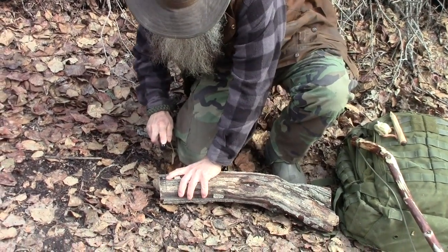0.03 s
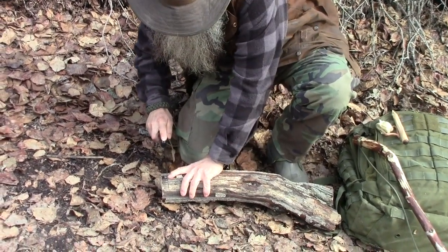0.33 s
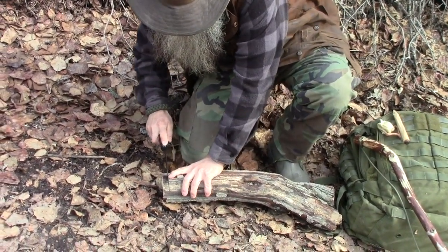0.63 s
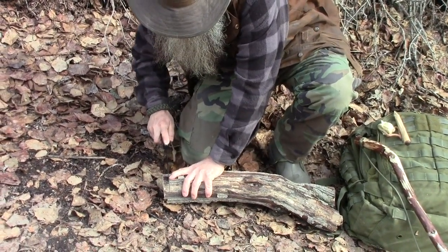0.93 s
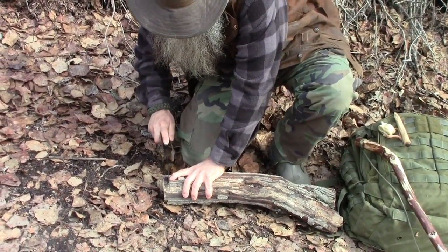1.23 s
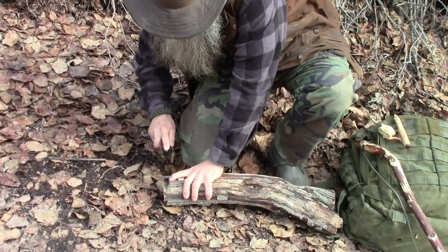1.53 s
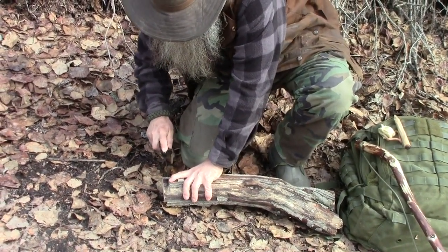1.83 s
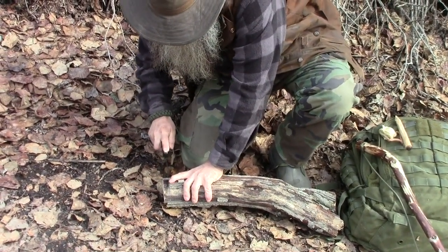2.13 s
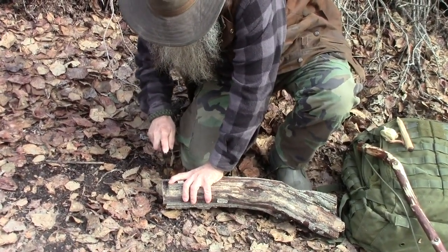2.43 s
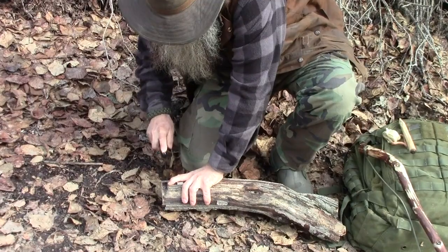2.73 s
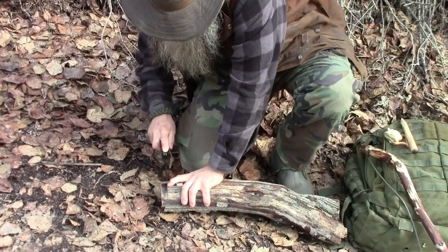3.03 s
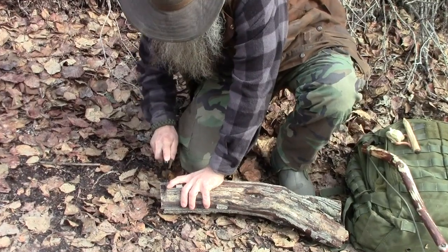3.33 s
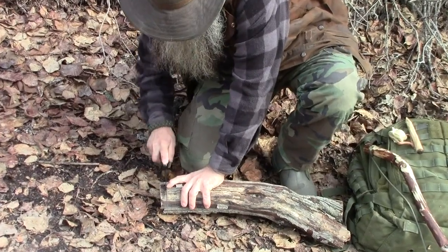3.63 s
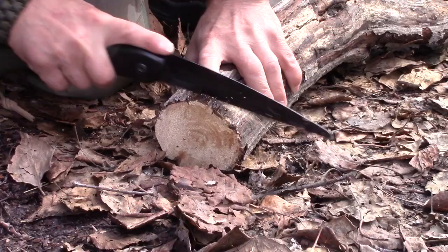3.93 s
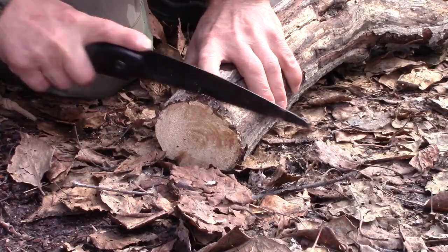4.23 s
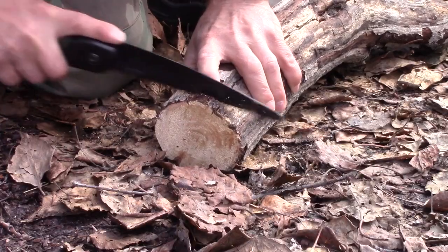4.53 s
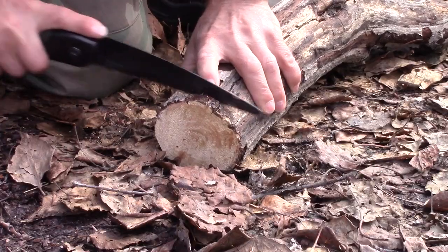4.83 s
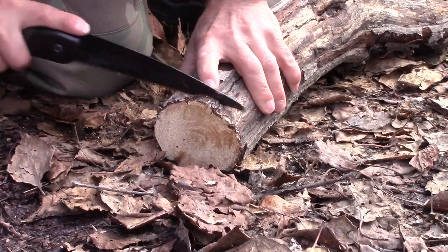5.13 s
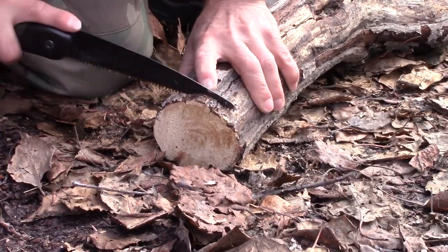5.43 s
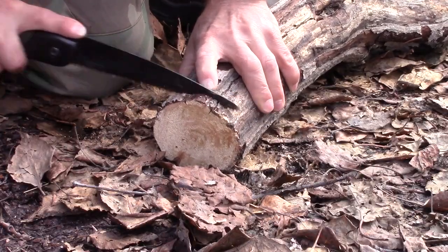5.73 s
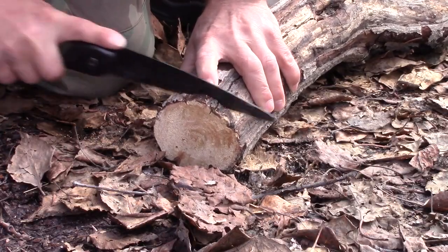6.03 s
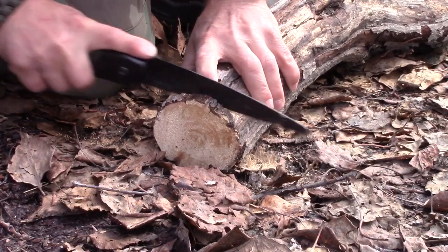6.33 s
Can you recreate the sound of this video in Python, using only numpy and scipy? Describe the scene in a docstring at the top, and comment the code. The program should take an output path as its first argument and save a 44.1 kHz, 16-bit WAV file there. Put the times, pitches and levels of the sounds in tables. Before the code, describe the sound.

Close by in a quiet forest, fallen leaves and clothing rustle while bark cracks and a hand saw makes a few light trial scrapes. Then the saw bites into the dry log and keeps going at about six strokes a second, louder than the rustling. The rasp starts splintery and grows firmer and more buzzing, with a ringing tone and occasional short squeaks from the blade.

```python
"""A hand saw cuts a dry log, six strokes a second, close by and outdoors. Its teeth tear fibres in a
rasp, drum a tone whose pitch follows the blade's speed, and drive a resonance near 900 Hz by friction.
Before the cut the saw scrapes lightly on the log. Bark and twigs snap by brittle fracture, the log
thuds on the soil and the binding blade squeaks. Fallen leaves crackle under a kneeling body,
over the faint hush of the forest. The sound is nearly mono."""
import sys
import numpy as np
from scipy import signal
from scipy.fft import rfft, irfft, next_fast_len
from scipy.io import wavfile
from scipy.ndimage import map_coordinates

SR = 44100
rng = np.random.default_rng(int(sys.argv[2]) if len(sys.argv) > 2 else 0)


def bounce(signal):
    """Save signal as a 16-bit WAV file at the path given by the first command-line argument."""
    frames = np.transpose(np.atleast_2d(signal))
    limited = np.clip(frames, -1, 1)
    pcm = np.round(limited * 32767).astype(np.int16)
    wavfile.write(sys.argv[1], SR, pcm)


N = 291060
TIME = np.arange(N) / SR
RING_HZ = 912  # the strongest resonance of blade and log

# Strokes, pull and push in turn: (start [s], rasp level [dB], moment of most force [0-1],
# ring level [dB], tooth tone over the rasp [dB])
STROKES = [(3.323, -22.5, 0.23, -29.5, -20), (3.434, -25.5, 0.08, -26.5, -36),
           (3.62, -24.5, 0.53, -29.5, -21), (3.77, -24.5, 0.31, -22.5, -19),
           (3.922, -23.5, 0.49, -27.5, -13), (4.074, -25, 0.28, -22.5, -23), (4.24, -23.5, 0.44, -30, -12),
           (4.393, -24, 0.32, -24, -3.5), (4.554, -26, 0.4, -27.5, .5), (4.723, -25.5, 0.47, -25, -13),
           (4.881, -25, 0.37, -28.5, -1.5), (5.051, -27.5, 0.4, -25, -6.5), (5.212, -25.5, 0.41, -28.5, 0),
           (5.375, -28, 0.3, -27, -3), (5.548, -28.5, 0.54, -31.5, 0.5), (5.707, -29, 0.41, -26, 1),
           (5.878, -28, 0.62, -31, -.5), (6.046, -27.5, 0.45, -25, -6.5), (6.228, -27.5, 0.35, -26, -2.5),
           (6.383, -27.5, 0.55, -25.5, -9), (6.55, -26.5, 0.56, -25, -10)]
# The cut deepens from hollow, splintery bark into firm wood: (time [s], spectral tilt [dB/kHz],
# bark lift [dB], splinter lift [dB], peakedness of the force [1], step between harmonics [dB])
KERF = [(3.38, 1.14, 9.5, 21.5, 0.96, -6), (3.65, .85, 3.5, 18, 1, -5), (4.2, 0.75, 0.5, -1.5, 0.89, -12),
        (4.5, .4, -4, 5.5, 1.24, -15), (5.2, 0.05, -4.5, 5, 1.53, -6.5), (5.7, -.5, -5, 6, 1.7, 0.5),
        (6.45, 0.64, 1, 7.5, 1.34, -4)]
def saw(teeth_per_stroke=33.3, last_turn_s=6.715, overlap_s=0.00197):
    """Reciprocating motion: equally many teeth pass in each stroke, so a shorter one sounds higher."""
    track = np.zeros(N)
    turns = [row[0] for row in STROKES[1:]] + [last_turn_s]
    times, *columns = np.transpose(KERF)
    for k, ((start, rasp_db, lean, ring_db, tone_db), turn) in enumerate(zip(STROKES, turns)):
        end = turn + overlap_s
        wood = [np.interp((start + end) / 2, times, column) for column in columns]
        tilt_db, bark_db, splinter_db, peakedness, overtone_db = wood
        # a push is duller and rings later than a pull
        extra_tilt_db, ring_lean = (-0.064, 0.59) if k % 2 else (0.34, 0.54)
        size = round((end - start) * SR)
        tooth_hz = teeth_per_stroke * SR / speed(size).sum()
        sound = stroke(size, rasp_db, ring_db, tilt_db + extra_tilt_db, bark_db, splinter_db,
                       lean, peakedness, ring_lean, tooth_hz, tone_db, overtone_db)
        add(track, start, sound)
    return track


# Spectrum of tearing wood: (frequency [Hz], relative level [dB])
RASP = [(30, -33), (110, -30), (170, -6.5), (260, 6), (400, 8), (700, 2.5), (1150, 5.5), (1650, -8),
        (2300, -14.5), (5500, -11), (8400, -15), (9800, -35.5), (12300, -42.5), (14500, -61)]
def stroke(size, rasp_db, ring_db, tilt_db, bark_db, splinter_db,
           lean, peakedness, ring_lean, tooth_hz, tone_db, overtone_db):
    """Forced vibration: each tooth tears fibres and nudges the log, giving noise, a ring and a tone."""
    rate_hz = tooth_hz * speed(size) * (1 + 0.0025 * wobble(226, size))
    phase = 2 * np.pi * np.cumsum(rate_hz) / SR
    bite = amp(1.66 * np.cos(phase) + 1.27 * wobble(152, size))  # the teeth catch and skip
    hold = grip(size, peakedness)
    force = hold * np.tanh(1.03 * arch(size, lean) ** (1.425 * peakedness))
    tearing = force * bite * fractures(20000, 1.5, size)
    evenness = min(1, amp(tone_db))  # an even stroke trades low rumble for tone
    wood_db = lambda hz: (along(RASP, hz) + body_db(hz) + tilt_db * np.minimum(hz / 1000, 11)
                          + bark_db * bump(hz, 2300, 1100) + splinter_db * bump(hz, 11850, 5400)
                          - 8 * evenness * bump(hz, 300, 740))
    tail = (0, SR // 50)
    rasp = colour(np.pad(patchy(tearing, depth_db=2.5), tail), wood_db)
    flutter = amp(1.5 * wobble(140, size))
    friction = hold * np.tanh(1.47 * arch(size, ring_lean) ** 2.14)
    ring = unit(friction * chatter(size) * flutter)
    # at full speed the teeth drum evenly enough to make a tone
    drumming = sum(amp(k * overtone_db) * np.sin((k + 1) * phase + rng.uniform(0, 2 * np.pi))
                   for k in range(3))
    tone = np.sqrt(2) * drumming * arch(size, 0.53) ** 5.26 * amp(wobble(83, size))
    pitched = amp(ring_db) * ring + amp(rasp_db + tone_db) * tone
    return amp(rasp_db) * rasp / rasp[:size].std() + np.pad(pitched, tail)


def speed(size):
    """Oscillation: the blade's speed is zero at each turn and 1 near mid-stroke."""
    return arch(size, 0.51) ** 0.787


def grip(size, peakedness, skate_db=-6, bite_share=0.015):
    """Slip, then engagement: the gain is low while the teeth skate and rises to 1 as they bite."""
    past_bite = np.linspace(0, 1, size) - 0.135 * peakedness
    return amp(skate_db * (1 - np.tanh(past_bite / bite_share)) / 2)


def chatter(size, width_hz=38.4, skirt_hz=330):
    """Friction-driven resonance: its swing saturates, so it sounds steadier than narrow-band noise."""
    shift = 1 + 0.013 * rng.uniform(-1.1, 1)  # the grip on the log detunes each stroke
    resonance_db = lambda hz: 10 * np.log10(bump(hz / shift, RING_HZ, width_hz)
                                            * bump(hz / shift, RING_HZ, 2 * skirt_hz))
    run_in = 2048
    driven = unit(colour(rng.standard_normal(size + run_in), resonance_db))
    swing = signal.hilbert(driven)[run_in:]
    return swing.real / (np.abs(swing) + 0.24) ** 0.11


# Modes of blade and log: (frequency [Hz], bandwidth [Hz], lift [dB])
MODES = [(1510, 150, 4), (1916, 256, 12.5), (2513, 340, 8.5), (3140, 390, 8.5), (3734, 410, 11.5),
         (4700, 560, 8.5), (8450, 116, 1.5)]
def body_db(hz):
    """Modal response: each mode lifts the spectrum around its own frequency."""
    return sum(db * bump(hz, centre, width) for centre, width, db in MODES)


# Trial scrapes on the bark: (start [s], end [s], rasp level [dB], ring level [dB],
# spectral tilt [dB/kHz], bark lift [dB])
SCRAPES = [(0, 0.141, -42.5, -53.5, 3, 5), (0.722, 0.866, -40, -50, 2.5, 0),
           (0.864, 1.023, -37, -35, 2.4, 0.5), (1.262, 1.362, -37, -34.5, 1.5, -7),
           (1.404, 1.578, -29.5, -34, 1.56, -4)]
def scrapes(resting_s=(0.6, 0.8), hum_db=-52.5, fade_db_per_s=252):
    """Light sliding friction: before the cut the blade scrapes the bark and hums against the log."""
    away_s = np.abs(TIME - np.clip(TIME, *resting_s))
    track = unit(chatter(N)) * amp(hum_db - fade_db_per_s * away_s)
    for start, end, rasp_db, ring_db, tilt_db, bark_db in SCRAPES:
        sound = stroke(round((end - start) * SR), rasp_db, ring_db, tilt_db, bark_db, splinter_db=4.5,
                       lean=0.52, peakedness=1.45, ring_lean=0.6,
                       tooth_hz=199, tone_db=-18, overtone_db=1)
        add(track, start, sound)
    return track


# Squeaks of the slowing blade: (middle [s], frequency [Hz], level [dB])
SQUEAKS = [(3.48, 1980, -23), (4.04, 2050, -26.5), (6.352, 2020, -32)]
def blade(steel_hz=2420, steel_db=-48.5, t60=0.46, squeak_s=0.076):
    """Free and friction-driven vibration: the handled steel rings faintly, then squeaks as it binds."""
    track = amp(steel_db - 60 * TIME / t60) * np.sin(2 * np.pi * steel_hz * TIME)
    size = round(squeak_s * SR)
    for middle, hz, db in SQUEAKS:
        phase = 2 * np.pi * np.cumsum(hz * (1 + 0.024 * wobble(310, size))) / SR
        add(track, middle - squeak_s / 2, amp(db) * np.hanning(size) * np.sin(phase))
    return track


# Bark and twigs breaking, the thicker ones lower:
# (time [s], crack peak [dB], ring over the crack [dB], own resonance [Hz])
SNAPS = [(0.0272, -18, -8, 7960), (0.356, -32, -28, 7550), (0.5454, -13, -22, 8200),
         (0.617, -25.5, -30, 7600), (0.6623, -9.5, -20, 4200), (0.6911, -14, -16, 3500),
         (0.7107, -10, -14, 3300), (0.7391, -11, -25, 7600), (0.7424, -11.5, -14, 2870),
         (0.754, -10.5, -28, 5500), (0.862, -22, -28, 6000), (1.296, -19, -18, 3970),
         (1.3998, -27.5, -10, 6000), (1.6451, -26, -35, 4500), (1.72, -18.5, -35, 4700),
         (3.0101, -30, 7, 600), (3.0293, -13.5, -9.5, 6500), (3.3099, -12.5, -16, 6000),
         (3.3352, -11, -9, 3000), (3.4062, -12.5, -18, 6960), (4.1034, -17.5, 9.5, 2000)]
# Spectrum of a crack: (frequency [Hz], relative level [dB])
CRACK = [(60, -16), (400, -12), (1100, -15), (1700, -14), (3000, -8), (4500, -4.5), (8300, -2.5),
         (10000, -14.5), (13000, -23), (15000, -37)]
def snaps(crack_t60=0.0064, crumble_t60=0.052, crumble_db=-21, ring_t60=0.037):
    """Brittle fracture: each break gives a sharp crack with its own colour, crumbs and a short ring."""
    track, t = np.zeros(N), np.arange(SR // 10) / SR
    ring = np.sin(2 * np.pi * RING_HZ * t) * amp(-60 * t / ring_t60) * (1 - np.exp(-t / 0.001))
    for start, db, ring_db, own_hz in SNAPS:
        burst = amp(-60 * t / crack_t60) * (1 - np.exp(-t / 0.0005)) * rng.standard_normal(len(t))
        burst += amp(crumble_db - 60 * t / crumble_t60) * fractures(2000, 1.6, len(t))
        piece_db = lambda hz: (along(CRACK, hz) + 5 * bump(hz, own_hz, 0.38 * own_hz)
                               + 0.3 * body_db(hz) + 2 * wobble(130, len(hz)))
        crack = colour(burst, piece_db)
        add(track, start, amp(db) * (crack / np.abs(crack).max() + amp(ring_db) * ring))
    return track


# The log rocks as the teeth first bite: (time [s], level [dB])
THUDS = [(3.335, -39), (3.37, -45)]
def thuds(t60=0.25):
    """Damped impact: soft soil answers the log with a short, dull thud."""
    track, t = np.zeros(N), np.arange(SR // 4) / SR
    for start, db in THUDS:
        soil = shaped(rng.standard_normal(len(t)), [(25, -3), (90, -3), (170, 6), (400, -32)])
        add(track, start, amp(db - 60 * t / t60) * soil)
    return track


# Leaves and clothes stirring: (time [s], crackle level [dB], shuffle level [dB])
RUSTLE = [(0, -47, -47), (.16, -53, -56), (.26, -54, -58), (.39, -61, -86), (.47, -47.5, -55.5),
          (.66, -50.5, -54), (1.07, -48, -46.5), (1.21, -56.5, -65), (1.29, -48.5, -48), (1.7, -43.5, -49),
          (1.87, -50.5, -53.5), (2.25, -50.5, -60), (2.56, -45, -49), (3, -47, -54), (3.33, -44.5, -46.5),
          (4.2, -47.5, -49), (5.55, -53.5, -54), (6.6, -46, -50.5)]
# A knee or boot crushes leaves: (middle [s], duration [s], extra crackle [dB], extra shuffle [dB])
CRUNCHES = [(1.982, 0.11, 8, 7), (2.63, 0.11, 8, -2), (2.757, 0.12, 4.5, 4.5), (2.888, 0.12, 8.5, 8),
            (3.187, 0.14, 5.5, 10.5)]
# Spectrum of dry leaves: (frequency [Hz], relative level [dB])
LEAVES = [(530, -24.5), (900, 2), (1270, -3.5), (1500, -7), (1740, -2.5), (2740, -4.5), (3070, -4),
          (3660, -5), (4830, -0.5), (6750, -1.5), (12300, -29), (13900, -51), (14300, -51)]
# Spectrum of cloth and soil: (frequency [Hz], relative level [dB])
SHUFFLE = [(35, -60), (60, -14.5), (183, -9.5), (257, -2), (725, -5.5), (887, -4.5), (1280, -27.5),
           (1500, -11.5), (1950, -52), (3300, -120)]
def rustle(flakes_db=-49, hard_stir_db=-39):
    """Shot noise: many tiny impulses add up to the crackle of leaves and a shuffle of cloth and soil."""
    times, *levels = np.transpose(RUSTLE)
    crackle_db, shuffle_db = (np.interp(TIME, times, level) for level in levels)
    for middle, length, more_crackle_db, more_shuffle_db in CRUNCHES:
        weight = np.maximum(0, 1 - 2 * np.abs(TIME - middle) / length)
        crackle_db += more_crackle_db * weight
        shuffle_db += more_shuffle_db * weight
    stirring = amp(crackle_db + 2.7 * wobble(45, N))  # leaves give way in clumps
    grains = fractures(2200, 1.5, N) + 1.2 * rng.standard_normal(N)
    crackle = stirring * shaped(patchy(grains, depth_db=1.5), LEAVES)
    # harder stirring crushes fine flakes, high in the treble
    flake_spectrum = [(4000, -37), (8500, 0), (10000, -13), (13000, -28), (14500, -30)]
    fine = shaped(fractures(1900, 1.6, N), flake_spectrum)
    flakes = amp(flakes_db) * (stirring / amp(hard_stir_db)) ** 1.3 * fine
    shuffle = shaped(fractures(3000, 4, N), SHUFFLE) * amp(shuffle_db + 2.7 * wobble(40, N))
    return crackle + flakes + shuffle


# Spectrum of the forest's hush: (frequency [Hz], relative level [dB])
AIR = [(20, 8.5), (60, -13), (150, -4), (500, -2), (2000, -21), (8000, -28), (11000, -68)]
def air(level_db=-63, side_db=-11):
    """Ambient noise: a faint, steady hush, partly coherent between left and right."""
    mid, side = shaped(rng.standard_normal((2, N)), AIR)
    return amp(level_db) * (mid + amp(side_db) * np.array([side, -side]))


# Side share of the saw's sound: (frequency [Hz], side gain [dB])
SAW_WIDTH = [(100, -21), (280, -29.5), (600, -25.5), (910, -35.5), (1300, -24.5), (2500, -19.5),
             (3800, -20.5), (8000, -16)]
# Side share of the leaves' sound: (frequency [Hz], side gain [dB])
LEAF_WIDTH = [(100, -11), (300, -14), (900, -14.5), (2500, -12), (8000, -11)]
def scatter(direct, width):
    """Diffuse reflection: weak echoes off ground and trunks reach the sides in random phase."""
    hz, _, spectra = signal.stft(direct, SR, nperseg=512)
    echoes = spectra * amp(along(width, hz))[:, None] * np.exp(2j * np.pi * rng.random(spectra.shape))
    side = np.sqrt(2) * signal.istft(echoes, nperseg=512)[1][:N]
    return np.array([direct + side, direct - side])


def fractures(per_second, spread_db, size):
    """Poisson process: tiny breaks at random moments, of widely varying strength."""
    breaks = rng.random(size) < per_second / SR
    return unit(breaks * rng.standard_normal(size) * amp(spread_db * rng.standard_normal(size)))


def patchy(x, depth_db):
    """Spectral modulation: the colour keeps shifting, as when a point of contact slides."""
    spectra = signal.stft(x, nperseg=256)[2]
    patch = np.outer(np.hanning(7), np.hanning(13))
    field = signal.fftconvolve(rng.standard_normal(spectra.shape), patch, "same")
    return signal.istft(spectra * amp(depth_db * unit(field)), nperseg=256)[1][:len(x)]


def colour(x, gain_db):
    """Minimum-phase filter: a causal response whose gain in dB is a function of frequency."""
    half = next_fast_len(x.shape[-1] // 2 + 4096)
    hz = np.fft.rfftfreq(2 * half, 1 / SR)
    cepstrum = irfft(np.log(amp(gain_db(hz)) + 1e-6))
    cepstrum[1:half] *= 2
    cepstrum[half + 1:] = 0
    return irfft(rfft(x, 2 * half) * np.exp(rfft(cepstrum)))[..., :x.shape[-1]]


def shaped(x, spectrum):
    """Source and filter: x coloured by (frequency [Hz], level [dB]) points, at rms 1."""
    return unit(colour(x, lambda hz: along(spectrum, hz)))


def bump(hz, centre_hz, width_hz):
    """Lorentzian resonance curve, 1 at its centre."""
    return 1 / (1 + (2 * (hz - centre_hz) / width_hz) ** 2)


def arch(size, lean):
    """Skewed half sine, from rest to rest, with its top at the share lean of the way."""
    way = np.interp(np.linspace(0, 1, size), [0, lean, 1], [0, 0.5, 1])
    return np.abs(np.sin(np.pi * way)) + 1e-6


def wobble(rate, size):
    """Spline through random values, rate knots a second."""
    knots = rng.standard_normal(int(size * rate / SR) + 4)
    return map_coordinates(knots, [np.arange(size) * rate / SR])


def along(points, hz):
    """Interpolation of (frequency [Hz], level [dB]) points on a log frequency axis."""
    frequencies, levels = np.transpose(points)
    return np.interp(np.log(hz + 1), np.log(frequencies), levels)


def amp(db):
    """Decibels to gain."""
    return 10 ** (np.asarray(db) / 20)


def unit(x):
    """Normalisation to rms 1."""
    return x / np.sqrt(np.mean(x ** 2) + 1e-20)


def add(track, start_s, sound):
    """Superposition of a sound on the track."""
    i = max(0, round(start_s * SR))
    track[i:i + len(sound)] += sound[:max(0, N - i)]


def scene():
    """Superposition: the cut is a point source straight ahead, with the leaves spread around it."""
    cut = scrapes() + saw() + snaps() + thuds() + blade()
    return scatter(cut, SAW_WIDTH) + scatter(rustle(), LEAF_WIDTH) + air()


def record(dry, ceiling=0.46, top_hz=14400):
    """Soft saturation rounds off the highest peaks; a band limit removes the top of the treble."""
    rounded = dry / (1 + np.abs(dry / ceiling) ** 8) ** (1 / 8)
    size = next_fast_len(N + SR // 2)
    passband = np.fft.rfftfreq(size, 1 / SR) < top_hz
    return irfft(rfft(rounded, size) * passband, size)[:, :N]


dry = scene()
out = record(dry)
bounce(out)
```